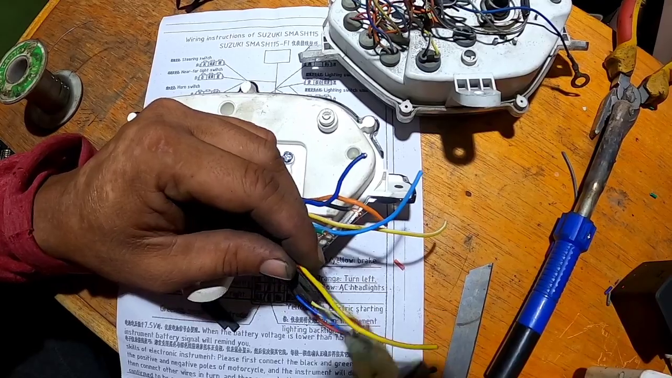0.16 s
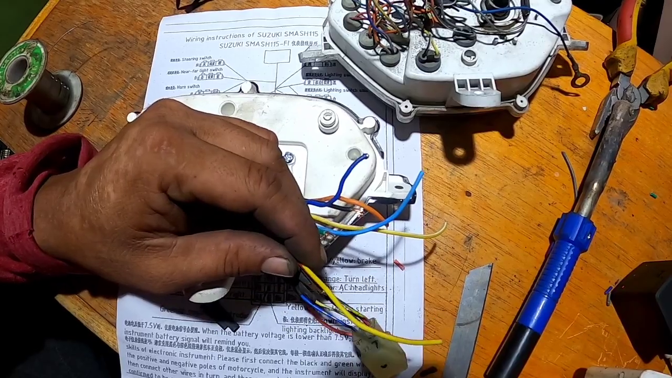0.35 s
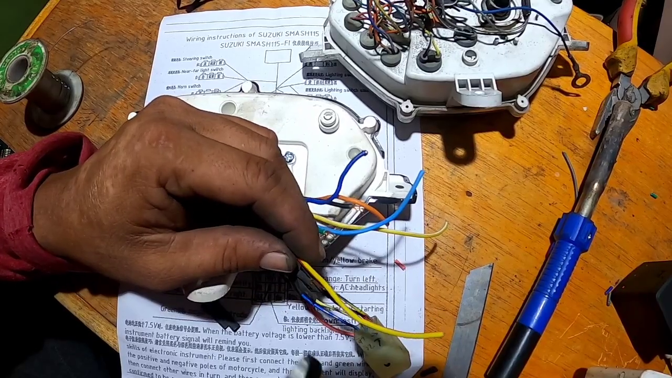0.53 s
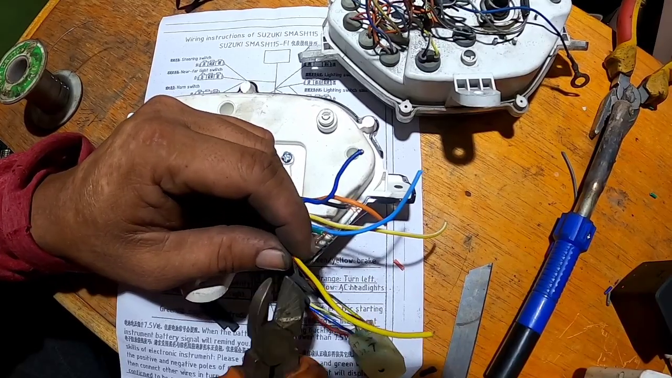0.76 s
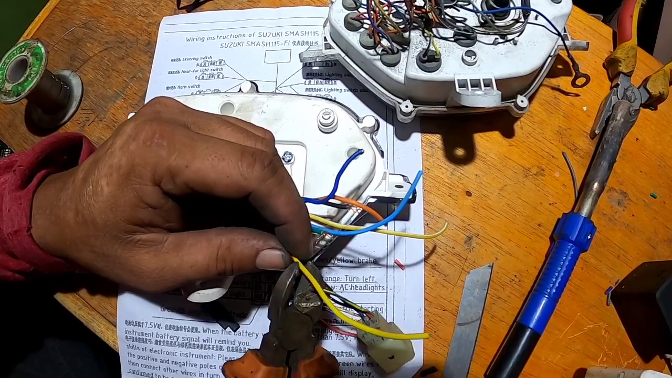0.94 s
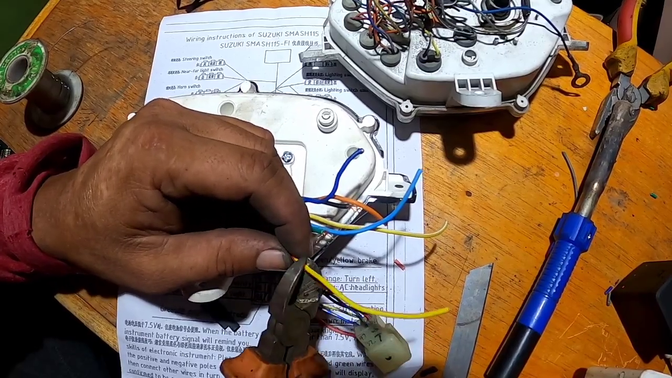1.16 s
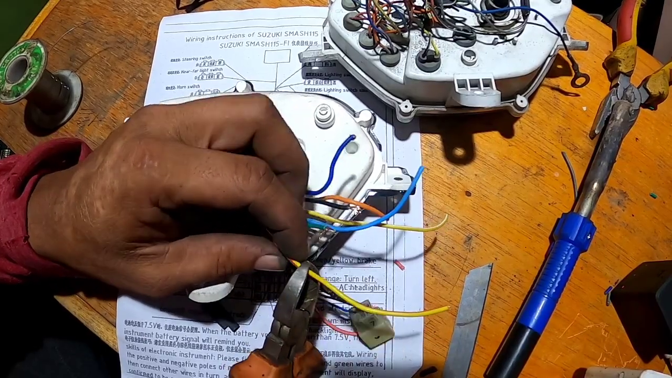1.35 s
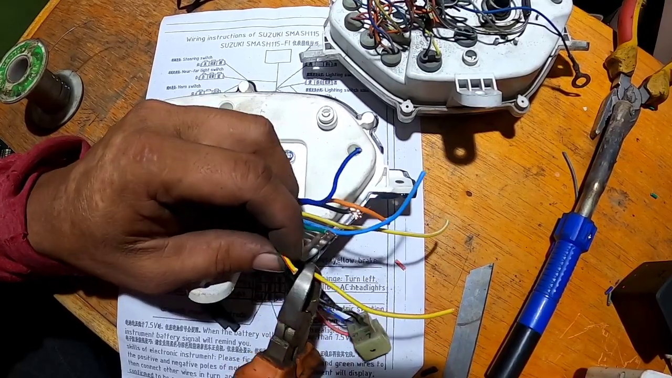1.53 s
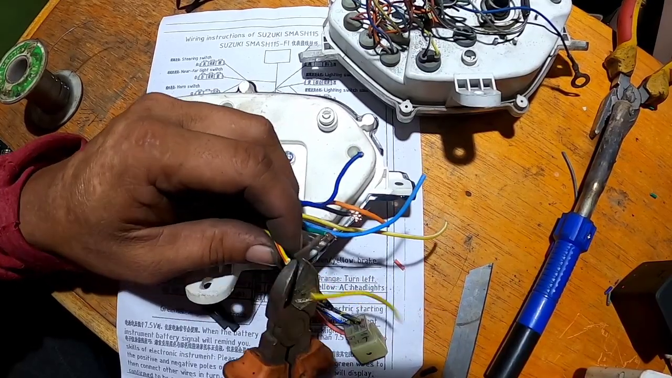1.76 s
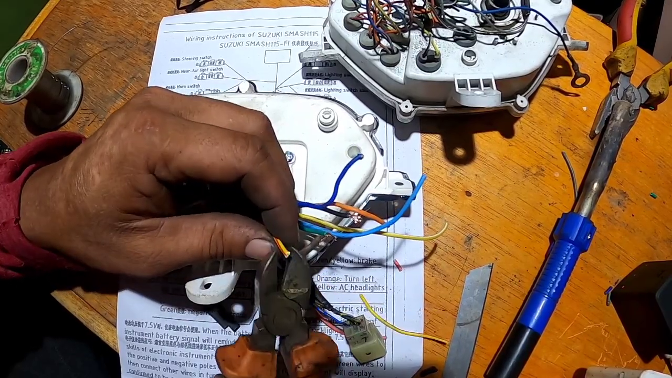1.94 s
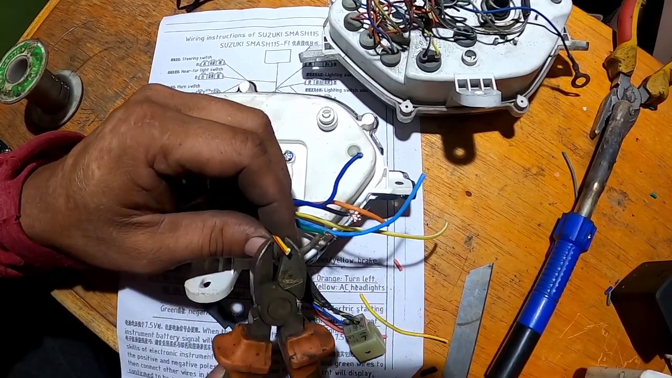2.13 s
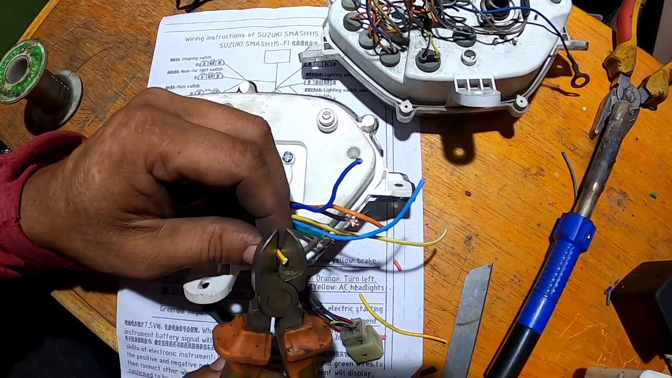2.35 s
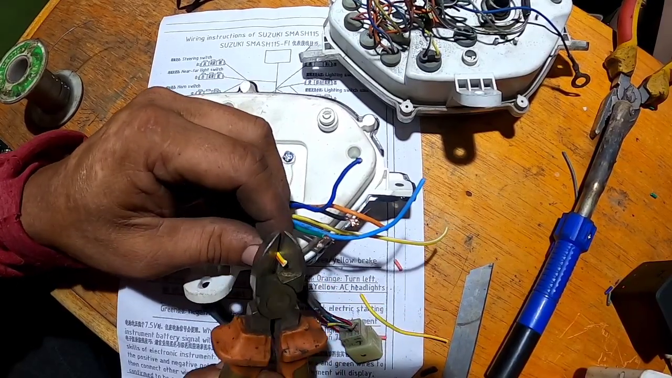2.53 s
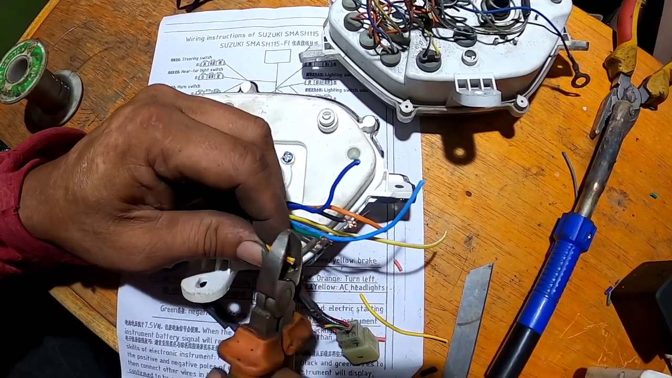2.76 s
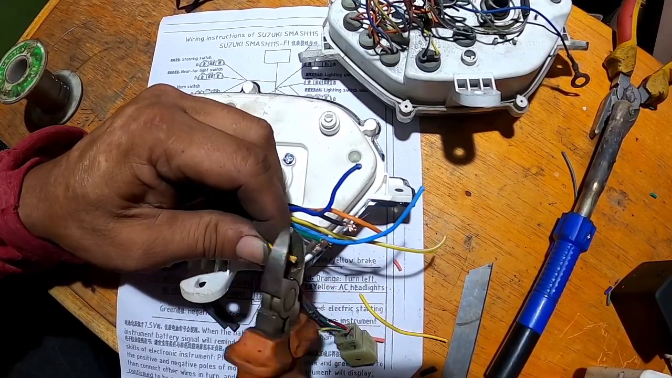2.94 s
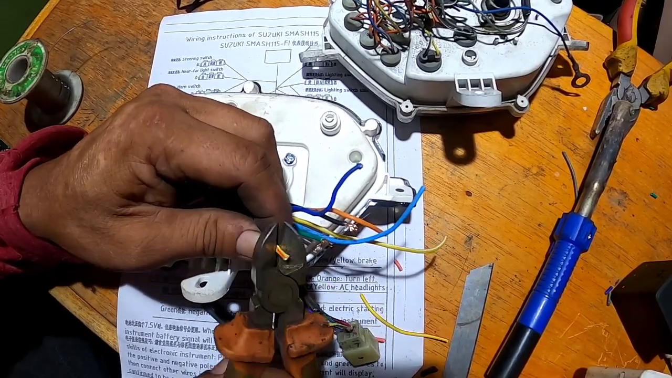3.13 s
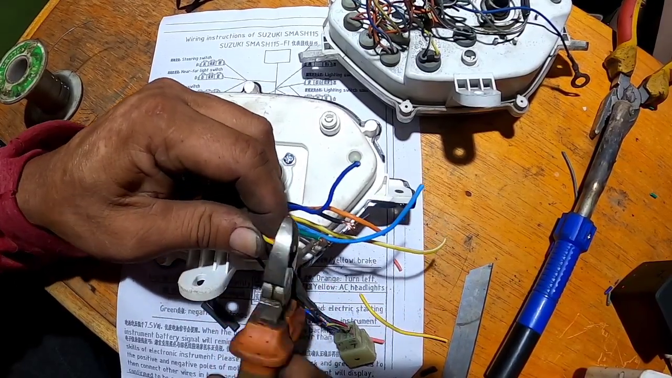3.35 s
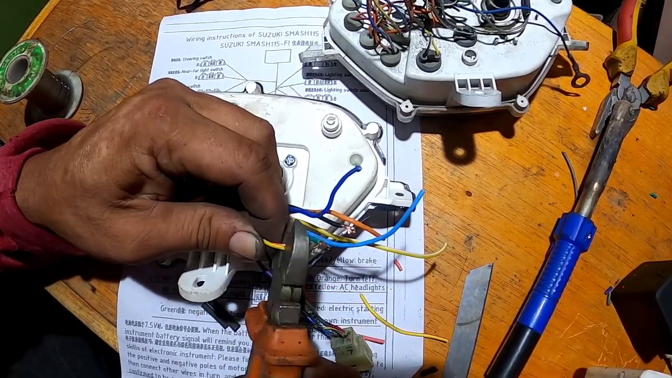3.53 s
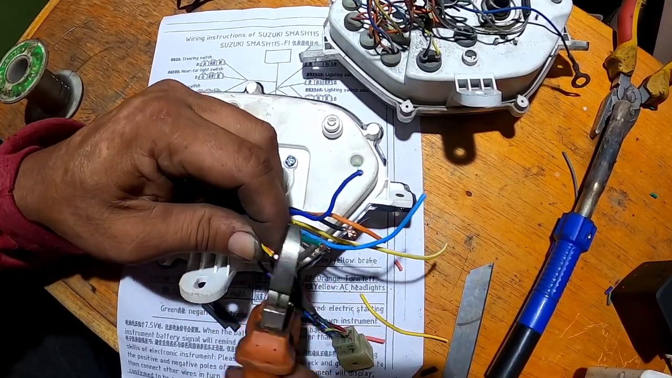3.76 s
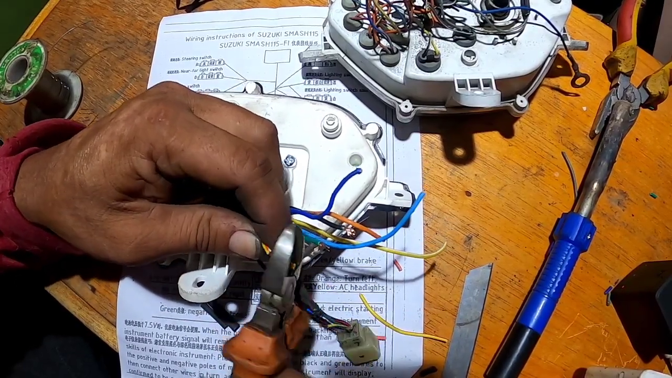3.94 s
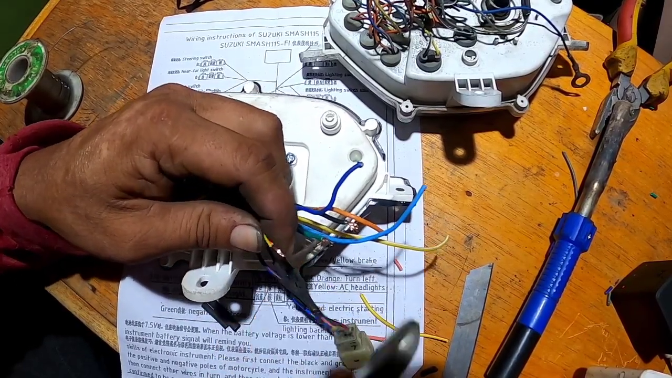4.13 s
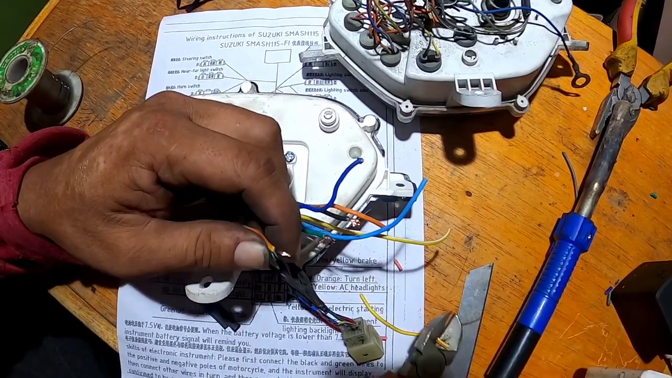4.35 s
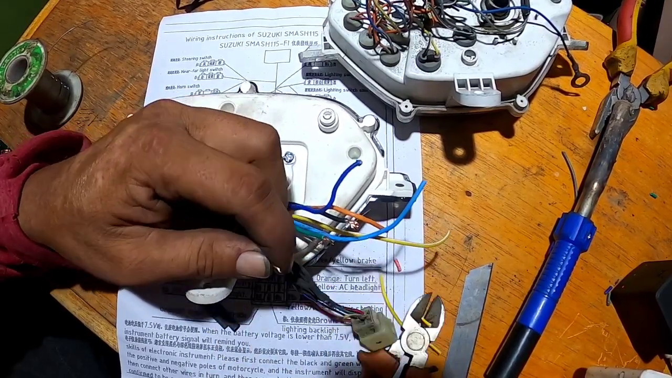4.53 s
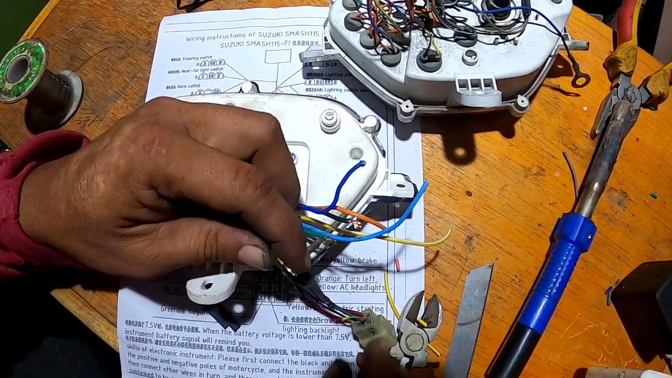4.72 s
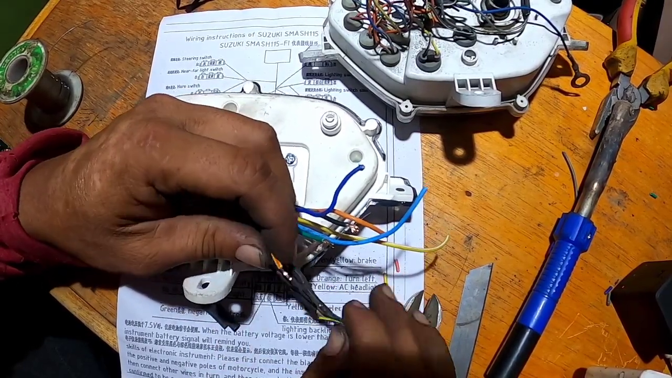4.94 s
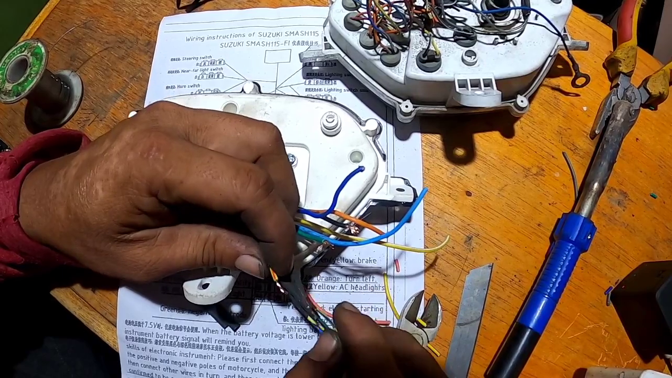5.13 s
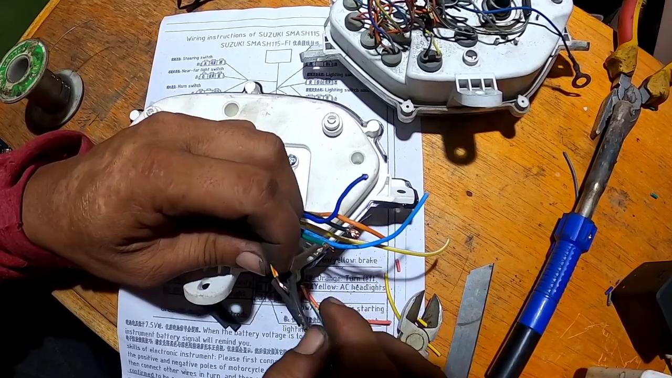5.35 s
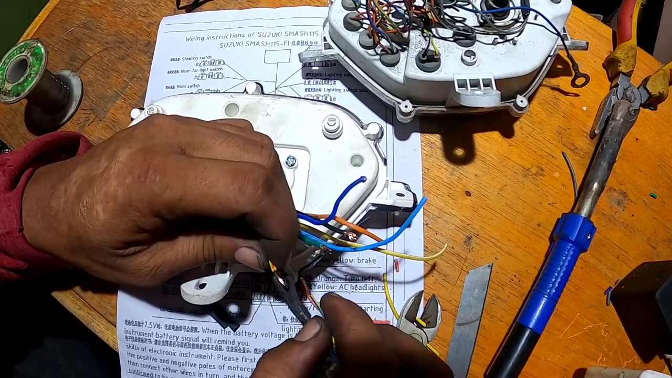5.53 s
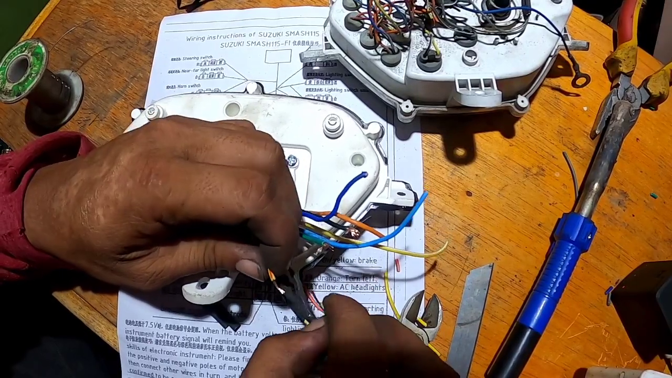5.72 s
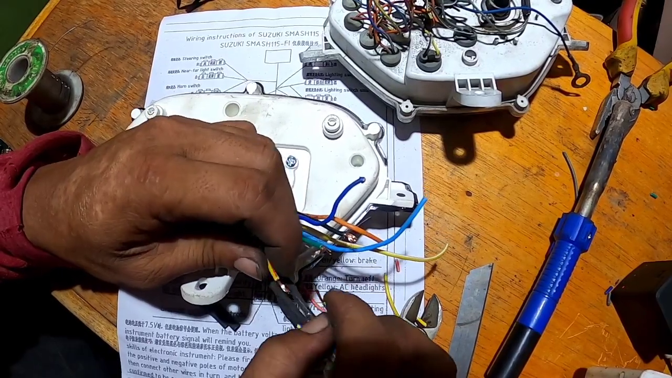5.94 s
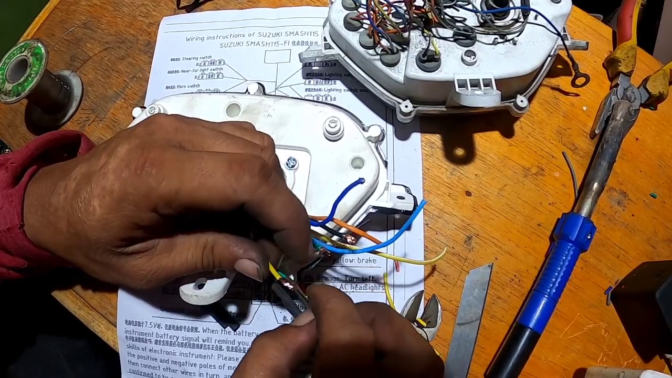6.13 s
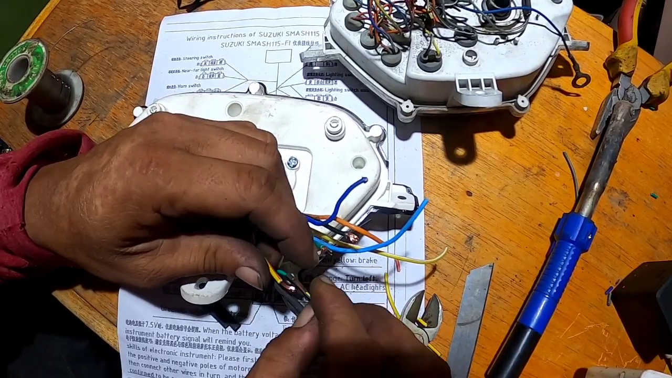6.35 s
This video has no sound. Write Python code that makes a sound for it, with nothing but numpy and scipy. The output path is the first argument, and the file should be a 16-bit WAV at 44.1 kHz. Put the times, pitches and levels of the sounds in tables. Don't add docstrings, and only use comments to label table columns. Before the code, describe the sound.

Hands work wires with pliers on a hollow wooden bench: light clicks, soft knocks, papery whisks, a faint wall clock each second. After an early snip things stay sparse, until a crack and the dropped tool's hard steel and wood bounces, by far the loudest event. Outside, an engine idles over far traffic; a thin cricket starts near the end. Close stereo pickup, short room.

```python
import sys
import numpy as np
from scipy import signal
from scipy.fft import rfft, irfft, next_fast_len
from scipy.io import wavfile
from scipy.ndimage import uniform_filter1d, map_coordinates

SR = 44100
rng = np.random.default_rng(int(sys.argv[2]) if len(sys.argv) > 2 else 0)


def ratio_of_db(decibels):
    return 10 ** (np.asarray(decibels, float) / 20)


def bounce(signal):
    frames = np.transpose(np.atleast_2d(signal))
    limited = np.clip(frames, -1, 1)
    pcm = np.round(limited * 32767).astype(np.int16)
    wavfile.write(sys.argv[1], SR, pcm)


N = 285768
SIDES = np.array([[0.5], [-0.5]])  # left, right share of a pan in dB


def unit(x):
    return x / np.sqrt(np.mean(x ** 2) + 1e-20)


def along(points, hz):
    f, v = np.transpose(points)
    return np.interp(np.log(hz + 1), np.log(f + 1), v)


def curves(rows):
    s, *cols = np.transpose(rows)
    return [np.interp(np.arange(N) / SR, s, c) for c in cols]


def wobble(rate):
    knots = rng.standard_normal(int(N * rate / SR) + 4)
    return map_coordinates(knots, [np.arange(N) * rate / SR])


def filtered(x, response):
    m = next_fast_len(N + 8192)
    return irfft(rfft(x, m) * response(np.fft.rfftfreq(m, 1 / SR)), m)[..., :N]


def ring(t, hz, db, t60, phase, rise):
    return ratio_of_db(db - 60 * t / t60) * np.sin(2 * np.pi * hz * t + phase) * (1 - np.exp(-t / rise))


def add(track, s, sound):
    start = round(s * SR)
    track[..., start:start + sound.shape[-1]] += sound


# frequency in Hz, left-right correlation [-1 to 1].
ALIKE = [(60, 0.8), (170, 0.94), (480, 0.81), (1360, 0.72), (3870, 0.59), (11000, 0.11)]


def rush(spectrum, ripple_db):
    knots = rng.standard_normal((2, 1200))

    def shape(hz):
        fine = np.interp(hz / 20, range(1200), knots[0])
        coarse = np.interp(hz / 170, range(1200), knots[1])
        turn = np.arccos(np.clip(along(ALIKE, hz), -1, 1)) / 2
        level_db = along(spectrum, hz) + ripple_db * (fine + 0.1 * coarse)
        return ratio_of_db(level_db) * [np.cos(turn), np.sin(turn)]

    mid, side = filtered(rng.standard_normal((2, N)), shape)
    return unit(np.array([mid + side, mid - side]))


# frequency in Hz, density in dB per Hz.
RUMBLE = [(12, -22), (20, -2), (50, 1), (61, 3.5), (80, -18), (102, -3), (147, -5.5), (173, -11),
          (248, -8.5), (382, -19.5), (500, -31.5), (650, -59.5), (1100, -120)]
# frequency in Hz, density in dB per Hz.
HISS = [(210, -14), (350, -13), (520, -1.5), (860, -8.5), (1050, -2), (1650, -5), (1900, -7.5), (2800, -12),
        (3150, -18.5), (4500, -22), (7000, -23.5), (7700, -31), (11400, -30.5), (14000, -99.5)]
# time in seconds, strength in dB.
TRAFFIC = [(0, 2), (.22, 3), (.85, 0), (1.32, 1), (1.86, 0.5), (2.2, 0.2), (2.7, -0.2), (3.4, 0.4),
           (3.86, -0.3), (4.17, 1.5), (4.6, 2), (5.77, 1), (6.23, 3), (6.48, 4.5)]


def traffic():
    rumble_db, hiss_db, hiss_follows = -46, -60, 0.46
    nearing_s, nearing_db_per_s = 5.36, 4
    traffic_db, = curves(TRAFFIC)
    near_db = nearing_db_per_s * np.maximum(np.arange(N) / SR - nearing_s, 0)
    rumble_db = rumble_db + traffic_db + 1.3 * wobble(6)
    hiss_db = hiss_db + hiss_follows * traffic_db + near_db + 1.5 + 0.4 * wobble(26)
    return ratio_of_db(rumble_db) * rush(RUMBLE, ripple_db=0.73) + ratio_of_db(hiss_db) * rush(HISS, ripple_db=1.4)


# start in seconds, length in seconds, level in dB.
SWELLS = [(-.1, 0.78, -36), (.84, .17, -54), (1.067, 0.25, -37.5), (1.307, 0.28, -29.5), (1.464, 0.29, -28),
          (1.828, .94, -37), (2.808, 0.22, -41.5), (3.144, 0.25, -37.5), (3.56, 0.27, -37),
          (4.037, 0.57, -45), (4.547, .13, -41), (4.824, 0.17, -45), (6.16, 0.25, -38)]


def boom():
    mode_hz, rise_s, fall_s, sag_db_per_s = 44.5, 0.091, 0.11, 9.5
    t = np.arange(N) / SR
    swells = np.zeros(N)
    for s, length_s, db in SWELLS:
        u = t - s
        slope = np.minimum(u / rise_s, (length_s - u) / fall_s)
        swells += ratio_of_db(db) * np.clip(slope, 0, 1) * ratio_of_db(-sag_db_per_s * u)
    return swells * np.sin(2 * np.pi * mode_hz * t)


# time in seconds, firing rate in Hz, level in dB, throttle [0 to 1].
ENGINE = [(0, 28.84, -51.5, 0.6), (.4, 29.11, -54.5, 0.56), (1, 29.16, -56.5, 0.4), (1.5, 29, -58.5, 0.96),
          (2, 28.9, -58.5, 0.57), (2.7, 29.41, -55.5, 0.35), (3.2, 29.68, -53.5, 0), (3.8, 28.98, -52, 0),
          (4.4, 29.03, -54.5, 0.03), (4.75, 29.68, -46, 0.25), (4.95, 28.67, -49, 0), (5.4, 28.7, -57, 0.7),
          (5.8, 28.61, -47.5, 0.22), (6.1, 28.7, -48.5, 0.81), (6.48, 28.5, -49.5, 0.73)]
# multiple of the firing rate, level in dB.
ORDERS_IDLE = [(1, -29), (2, -26), (3, -27.5), (4, -9), (5, 3), (7, -11), (8, -40), (9, -8.5), (10, -8.5),
               (11, -18.5), (13, -37)]
# multiple of the firing rate, level in dB.
ORDERS_OPEN = [(1, 11.5), (2, 0.5), (3, -2), (4, 9), (5, 0), (7, -28), (8, -37), (9, 0.5), (10, 0),
               (11, -10.5), (13, -12.5)]


def engine():
    tones = np.zeros(N)
    rate_hz, engine_db, throttle = curves(ENGINE)
    turn = 2 * np.pi * np.cumsum(rate_hz) / SR
    for (k, idle_db), (_, open_db) in zip(ORDERS_IDLE, ORDERS_OPEN):
        order_db = idle_db + throttle * (open_db - idle_db)
        level_db = engine_db + 3 + order_db + 1.3 * wobble(5)
        tones += ratio_of_db(level_db) * np.sin(round(k) * turn + 0.12 * wobble(1.46))
    return tones


# frequency in Hz, left over right in dB.
LEAN = [(60, 3), (220, -0.5), (810, 1.5), (2980, 5), (11000, 2.5)]


def surroundings():
    return filtered(traffic() + boom() + engine(), lambda hz: ratio_of_db(SIDES * along(LEAN, hz)))


def ticks(contacts, ring_db, spike_db, top_hz, spit_hz):
    tick_lag_s = 0.0006
    out, t = np.zeros((2, N + SR)), np.arange(1300) / SR
    bright = signal.butter(4, spit_hz, "high", fs=SR)
    body = signal.butter(4, [1300, top_hz], "band", fs=SR)
    click = np.arange(len(t)) == 0
    brief = ratio_of_db(-60 * t / 0.007)
    rattle_decay = ratio_of_db(-60 * t / 0.0084) + ratio_of_db(-13.5 - 60 * t / 0.14)
    spit_decay = brief + ratio_of_db(-35 - 60 * t / 0.036)
    for s, db, hz, top_db, pan_db in contacts:
        noise, phase = rng.standard_normal((3, len(t))), rng.uniform(0, 6.64, 2)
        grit = noise[0] + noise[1:]
        jaws = ring(t, hz, ring_db, 0.011, phase[0], 0.00021)
        jaws = jaws + ring(t, hz * 0.83, ring_db - 2.5, 0.0087, phase[1], 0.00019)
        spike = ratio_of_db(spike_db) * signal.lfilter(*body, 2.4 * click + 1.02 * grit * brief)
        near = signal.butter(2, [hz * 0.75, hz * 1.25], "band", fs=SR)
        rattle = 0.39 * signal.lfilter(*near, noise[0] + 0.36 * noise[1:]) * rattle_decay
        spit = ratio_of_db(top_db + 9) * signal.lfilter(*bright, 0.93 * click + grit) * spit_decay
        add(out, s + tick_lag_s, ratio_of_db(db - 3 + SIDES * pan_db) * (jaws + spike + rattle + spit))
    return out[:, :N]


def small_ticks(contacts, top_db, pan_db):
    scatter_db = 3
    placed = [(*row, top_db, pan_db + scatter_db * rng.standard_normal()) for row in contacts]
    return ticks(placed, ring_db=-4, spike_db=4, top_hz=6860, spit_hz=7400)


# time in seconds, peak in dB, centre in Hz.
JAW_TICKS = [(.0258, -35, 4770), (.0318, -41, 3600), (.0603, -48, 4300), (.0635, -45.5, 4300),
             (3.8205, -54, 5500), (4.385, -50, 4000), (.3711, -55, 3440), (.409, -30.5, 4350),
             (.5639, -42.5, 5340), (.7474, -48, 3370), (1.4236, -51, 3380), (1.7045, -47, 6260),
             (1.7214, -51, 3648), (1.9795, -42, 3800), (2.117, -35.5, 6490), (2.2094, -34, 5460),
             (3.023, -49.5, 6145), (3.4161, -54, 3450), (3.5973, -42, 5150), (4.0066, -37, 4600),
             (4.1, -56, 6690), (4.1133, -46, 6700), (4.125, -44, 5940), (4.189, -46.5, 3360),
             (4.3705, -38.5, 5300), (4.5025, -41, 3850), (4.8654, -39.5, 4007), (4.9255, -42, 4300),
             (5.1736, -41, 4430), (5.7293, -40.5, 4600), (6.0492, -45, 3356), (6.0888, -45.5, 3543)]


def jaw_ticks():
    return small_ticks(JAW_TICKS, top_db=-27, pan_db=1)


# time in seconds, board peak in dB, board pitch
# in Hz, housing in dB, struck spot in Hz.
KNOCKS = [(0.027, -48.5, 322, 1, 1400), (0.181, -48.5, 290, 9, 1430), (.218, -26, 298, -9, 1150),
          (.226, -35, 288, -22, 1160), (.249, -30, 275, -15, 1310), (.285, -34.5, 292, -22, 1120),
          (.268, -27, 280, -14, 1130), (1.6348, -22, 276, -16, 666), (1.973, -37.5, 280, -23, 696),
          (2.0768, -21.5, 266, 2.5, 1470), (2.079, -32.5, 270, 6.5, 646), (2.19, -37, 295, 6, 2100),
          (2.232, -44.5, 249.6, 2, 750), (4.721, -26.5, 239, -2, 660), (4.7575, -2.5, 260, -11, 1350),
          (4.773, -6, 252, -11, 657), (4.784, -19, 270, -10, 630), (4.798, -13, 284, -25, 520),
          (4.8826, -13, 290, -24, 640), (4.8304, -2, 276.4, -17.5, 605), (4.8526, -6, 200, -12, 1150),
          (4.866, -10, 293, -24, 920), (4.899, -10.5, 328, -13, 1150), (4.9065, -13, 290, -14, 680),
          (4.919, -22, 384, -14, 1150), (4.932, -19, 297, -15, 643), (5.161, -38, 294, -3.5, 1450)]
# frequency in Hz, level in dB, t60 in seconds.
BOARD = [(139.7, -21, 0.16), (206, -13, 0.063), (242.6, -10.5, 0.16), (294, -6.5, 0.11),
         (381.3, -9.5, 0.12), (524, -8.5, 0.066)]
# frequency in Hz, level in dB, t60 in seconds.
HOUSING = [(646, 4.5, 0.041), (810, -3, 0.026), (976, 1.5, 0.034), (1150, 5.5, 0.022), (1350, 4.5, 0.021),
           (1625, -0.5, 0.031), (2050, -5, 0.039), (2160, -11.5, 0.071)]


def board_ring(t, s, pitch_hz):
    let_go_s, rest_s, rest_db_per_s = 4.5, 4.943, 230
    free = 0.73 if s > let_go_s else 0.66
    board = ring(t, pitch_hz, 2.7, 0.096 * free, 0.26, 0.0012)
    for hz, db, t60 in BOARD:
        board = board + ring(t, hz, db, t60 * free, 0.73, 0.0021)
    return board * ratio_of_db(-rest_db_per_s * np.maximum(s + t - rest_s, 0) * (s < rest_s))


def housing_rattle(t, struck_hz):
    shell = np.zeros((2, len(t)))
    for hz, db, t60 in HOUSING:
        a, b = rng.standard_normal(2)
        shell += ratio_of_db(3 * SIDES * a) * ring(t, hz * (1 + 0.015 * a), db + 1.5 * b, t60, 2 * a, 0.00053)
    shell += ring(t, struck_hz, 7, 0.025, 0, 0.0006)
    dull = signal.butter(2, [500, 2800], "band", fs=SR)
    noise = rng.standard_normal((3, len(t)))
    decay = ratio_of_db(-60 * t / 0.03) + ratio_of_db(-15.5 - 60 * t / 0.049)
    return shell + 1.75 * signal.lfilter(*dull, noise[0] + 1.1 * noise[1:]) * decay


def knocks():
    board_lag_s = 0.00317
    out, t = np.zeros((2, N + SR)), np.arange(7000) / SR
    for s, db, pitch_hz, housing_db, struck_hz in KNOCKS:
        add(out, s, ratio_of_db(db + housing_db - 6.5 - SIDES) * housing_rattle(t, struck_hz))
        add(out, s + board_lag_s, ratio_of_db(db - 2.5 - 1.7 * SIDES) * board_ring(t, s, pitch_hz))
    return out[:, :N]


def rubbing(strokes, centre_hz, top_db, hollow_db, width_hz=1500):
    out = np.zeros((2, N + SR))
    for s, length_s, db in strokes:
        n = round(length_s * SR)
        f, u = np.fft.rfftfreq(n, 1 / SR), np.arange(n) / n
        peak = lambda hz, width: 1 / (1 + ((f - hz) / width) ** 2)
        colour = peak(centre_hz, width_hz) ** 2
        colour = colour + ratio_of_db(top_db) * peak(8800, 3 * width_hz) + ratio_of_db(hollow_db + 7) * peak(1600, 350)
        stick_slip_db = 2.6 * unit(uniform_filter1d(rng.standard_normal(n), size=90))
        slips = rng.standard_normal((2, n)) * ratio_of_db(stick_slip_db)
        slips = slips + 0.28 * slips[::-1]
        stroke = np.sin(np.pi / 2 * np.minimum(u / 0.24, 1)) * (1 - u ** 2.8)
        add(out, s, ratio_of_db(db) * stroke * unit(irfft(rfft(slips) * colour, n)))
    return out[:, :N]


# start in seconds, length in seconds, level in dB.
DRAGS = [
    (0.029, 0.025, -69),
    (.563, 0.11, -56),
    (0.054, 0.045, -67),
    (0.84, .05, -58),
    (7.1, 0.03, -53),
    (3.892, 0.055, -61.5),
    (4.3, 0.04, -61),
    (6.4, 0.64, -65.5),
]


def drags():
    return rubbing(DRAGS, centre_hz=3940, top_db=-16, hollow_db=2)


# time in seconds, peak in dB, centre in Hz.
WIRE_TICKS = [(.1745, -47, 3450), (.1804, -55, 5360), (.2195, -38.5, 3860), (1.6245, -40.5, 6800),
              (1.639, -50, 5300), (1.6445, -50, 6000), (1.652, -42, 5030), (1.6825, -50, 6000),
              (2.0492, -52, 3420), (2.1035, -42, 5500), (2.1335, -45, 5000), (2.1628, -50, 6500),
              (2.2322, -44, 5800), (2.2398, -52, 5000), (2.3757, -49, 6400), (2.7505, -32, 5500),
              (3.476, -56, 5317), (3.9, -51, 5940), (3.9072, -40.5, 5000), (4.298, -58, 6000),
              (4.319, -50, 6000), (5.721, -51, 6500), (4.1565, -55.5, 6500), (4.2562, -50, 3486),
              (4.2781, -48.5, 4886), (5.6885, -47, 6180)]


def wire_ticks():
    return small_ticks(WIRE_TICKS, top_db=-11, pan_db=0)


# start in seconds, length in seconds, level in dB.
WHISKS = [(.186, 0.02, -63), (.22, 0.018, -56), (1.57, 0.04, -66), (1.638, 0.018, -62), (1.68, .02, -67),
          (1.703, 0.014, -63), (2.73, .02, -78), (2.752, 0.066, -70), (3.733, .014, -69), (4.36, .04, -58),
          (4.476, 0.028, -63), (2.082, 0.18, -59), (2.192, 0.081, -59), (2.439, 0.081, -67.5),
          (3.006, 0.063, -69), (4.148, .05, -65), (4.256, 0.053, -63), (4.31, 0.072, -66),
          (4.415, 0.065, -61), (4.645, 0.031, -62.5)]


def whisks():
    return rubbing(WHISKS, centre_hz=5400, top_db=-8, hollow_db=-9)


# start in seconds, length in seconds, level in dB.
SLIDES = [
    (.228, .04, -53),
    (.25, .045, -49),
    (.278, .045, -53.5),
    (.41, 0.02, -57),
    (1.964, .11, -57.5),
    (4.362, 0.04, -61),
    (5.73, 0.087, -64),
]


def slides():
    return rubbing(SLIDES, centre_hz=3980, top_db=-17, hollow_db=-8.5)


# time in seconds, level in dB.
CLOCK = [
    (.75, -52),
    (1.752, -50),
    (2.754, -49.5),
    (3.753, -49.5),
    (5.749, -52),
]
# seconds after the step, level in dB.
CLOCK_STEP = [
    (-.02, -2),
    (0, 2.5),
    (.012, -7),
    (.033, -1),
    (.062, -6.5),
]
# frequency in Hz, width in Hz, level in dB.
CLOCK_CASE = [(1670, 280, 4), (3600, 650, -6.5), (5300, 1100, -17), (7000, 2000, -24.5)]


def clock():
    rise_s, t60_s = 0.0018, 0.14
    out, t = np.zeros((2, N + SR)), np.arange(5000) / SR
    f = np.fft.rfftfreq(len(t), 1 / SR)
    case = sum(ratio_of_db(db) / (1 + ((f - hz) / width) ** 2) for hz, width, db in CLOCK_CASE)
    for s, db in CLOCK:
        for after_s, lurch_db in CLOCK_STEP:
            noise = rng.standard_normal((3, len(t)))
            grit = unit(irfft(rfft(noise[0] + 0.87 * noise[1:]) * case, len(t)))
            decay = ratio_of_db(db + lurch_db - 60 * t / t60_s) * (1 - np.exp(-t / rise_s))
            add(out, s + after_s, decay * grit)
    return out[:, :N]


# time in seconds, peak in dB, centre in Hz.
STRAND_TICKS = [
    (1.5861, -61, 5424),
    (2.1433, -42, 3640),
    (2.3083, -48.5, 4040),
    (2.358, -55, 4072),
    (2.4225, -56, 5260),
    (2.4608, -50, 3790),
    (2.4672, -44.5, 4105),
]


def strand_ticks():
    return small_ticks(STRAND_TICKS, top_db=-5, pan_db=-1)


# time in seconds, peak in dB, centre in Hz, top in dB, pan in dB.
SNAPS = [(2.0764, -18, 3180, -16.5, 3), (2.0764, -27, 6450, -21, 3), (4.7235, -31, 3340, -12, -2),
         (4.7566, -17, 2920, -40, 3.5), (4.7735, -24.5, 3040, -32.5, -2), (4.8298, -13, 3910, -38, 0.5),
         (4.8516, -9.5, 4510, -23.5, -1), (4.8525, -21, 5560, -26, 2), (4.8984, -17, 4280, -28, -2),
         (4.8988, -18, 3000, -30, -3), (4.8988, -25, 5800, -29, -1.5), (4.9148, -25.5, 3170, -31.5, 2.5)]


def snaps():
    return ticks(SNAPS, ring_db=0, spike_db=-0.5, top_hz=4700, spit_hz=8500)


# time in seconds, peak in dB, centre in Hz, top in dB, pan in dB.
CUTS = [
    (2.1892, -16, 4650, -25, 1.5),
    (4.7124, -24, 3930, -10.5, 0),
]


def cuts():
    return ticks(CUTS, ring_db=-10.5, spike_db=3, top_hz=5950, spit_hz=8000)


# start in seconds, length in seconds, level in dB.
SKIDS = [
    (4.713, .064, -40),
    (4.764, 0.085, -53),
    (4.831, 0.017, -56),
    (4.863, 0.056, -45.5),
    (4.903, 0.076, -53),
]


def skids():
    return rubbing(SKIDS, centre_hz=3650, top_db=-18, hollow_db=-4.5)


# start in seconds, length in seconds, level in dB.
SQUEAKS = [
    (5.131, 0.036, -53.5),
    (5.167, .048, -51.5),
]


def squeaks():
    return rubbing(SQUEAKS, centre_hz=4300, top_db=-20.5, hollow_db=-18.5, width_hz=720)


# time in seconds, pulse level in dB.
CRICKET = [
    (5.2, -65),
    (5.4, -64),
    (5.55, -72),
    (5.75, -62),
    (5.95, -61),
    (6.2, -63),
    (6.48, -61),
]


def cricket():
    first_s, period_s, pitch_hz = 5.255, 0.03835, 4720
    out, t = np.zeros(N + SR), np.arange(900) / SR
    for s in np.arange(first_s, N / SR, period_s):
        db = np.interp(s, *np.transpose(CRICKET)) + rng.normal(0, 4) - 3
        add(out, s, ring(t, pitch_hz, db + 9, 0.012, 0, 0.002))
    return out[:N]


# frequency in Hz, t60 in seconds.
ROOM = [(200, 0.22), (1000, 0.14), (4000, 0.06), (10000, 0.05)]


def room(x):
    hz, t, z = signal.stft(rng.standard_normal((2, SR // 2)), SR, nperseg=256)
    tail = signal.istft(z * ratio_of_db(-60 * t / along(ROOM, hz)[:, None]), SR, nperseg=256)[1]
    tail = tail + 0.74 * tail[::-1]
    delayed = np.pad(x, (150, 0))[None]
    return signal.fftconvolve(delayed, tail / np.linalg.norm(tail[0]), axes=1)[:, :N]


def scene():
    hits = jaw_ticks() + knocks() + wire_ticks() + strand_ticks() + snaps() + cuts()
    rubs = drags() + whisks() + slides() + skids() + squeaks()
    return surroundings() + hits + ratio_of_db(-14) * room(hits.mean(axis=0)) + rubs + clock() + cricket()


def low_pass(x):
    return signal.sosfilt(signal.butter(12, 11550, fs=SR, output="sos"), x)


def record(dry):
    top_hz, ceiling = 10700, 0.95
    duck_s, duck_db, fall_s, hold_s, back_s = 4.9, -5.5, 0.14, 0.34, 0.55

    def ports(hz):
        lag = np.exp(-1j * np.outer([1, -1], np.pi * 1.6 * 6000 / SR * np.tanh(hz / 6000)))
        tilt = ratio_of_db(np.outer([-1, 1], 2 / (1 + (7000 / (hz + 1)) ** 6)))
        return lag * tilt / (1 + (hz / top_hz) ** 24)

    x = filtered(dry, ports)
    turns_s = np.cumsum([duck_s, fall_s, hold_s, back_s])
    x = x * ratio_of_db(np.interp(np.arange(N) / SR, turns_s, [0, duck_db, duck_db, 0]))
    x = x / (1 + np.abs(x / ceiling) ** 6) ** (1 / 6)
    return low_pass(x)


dry = scene()
out = record(dry)
bounce(out)
```